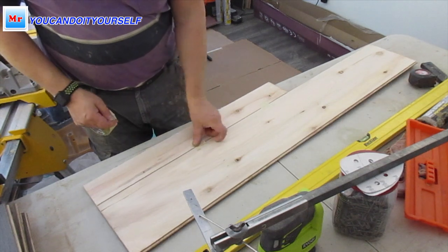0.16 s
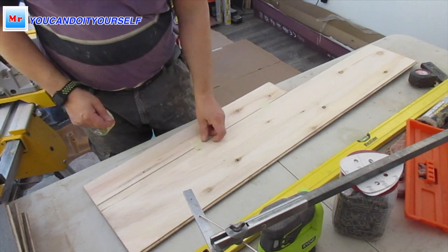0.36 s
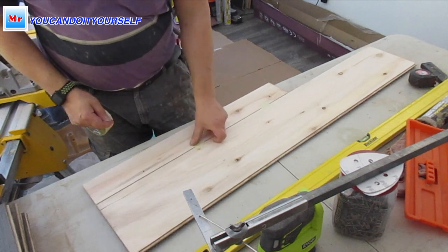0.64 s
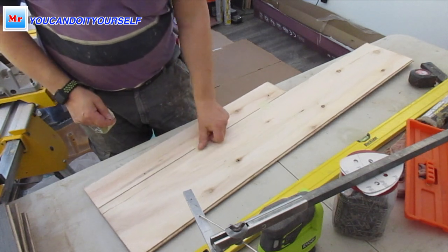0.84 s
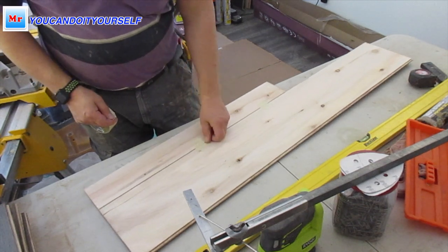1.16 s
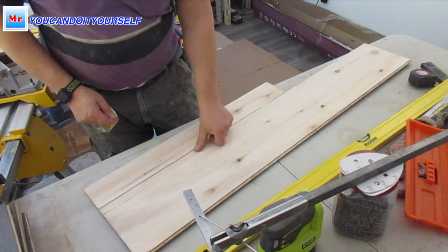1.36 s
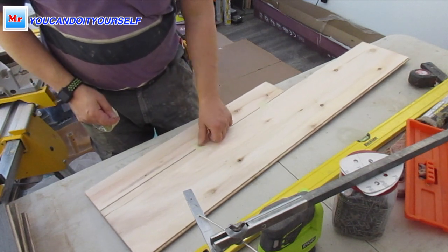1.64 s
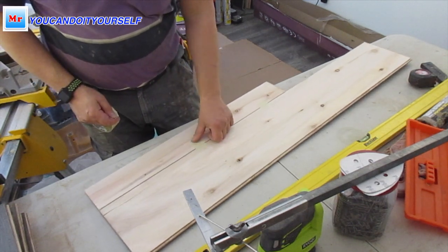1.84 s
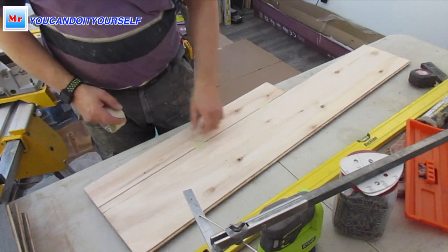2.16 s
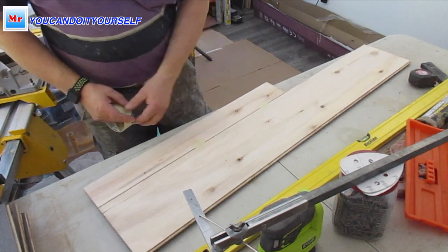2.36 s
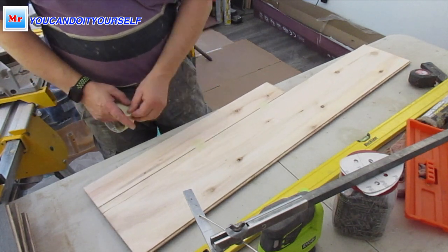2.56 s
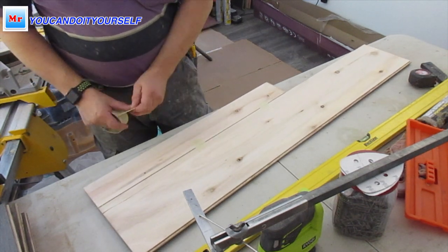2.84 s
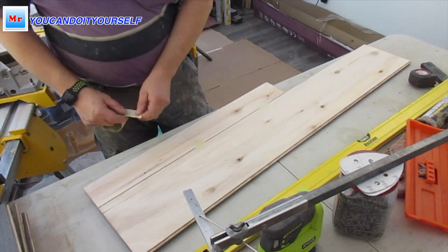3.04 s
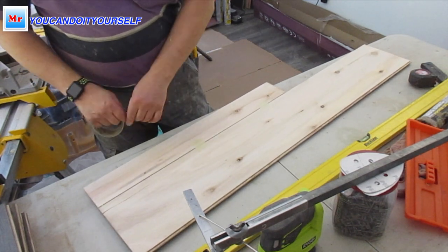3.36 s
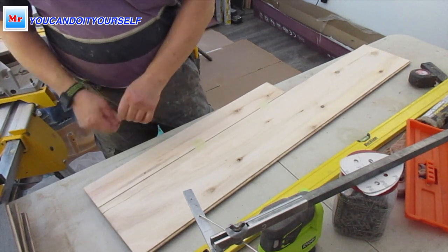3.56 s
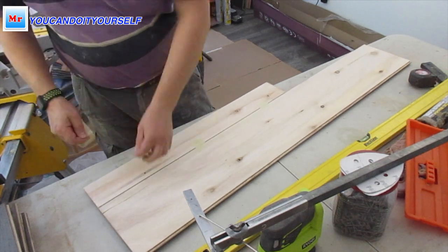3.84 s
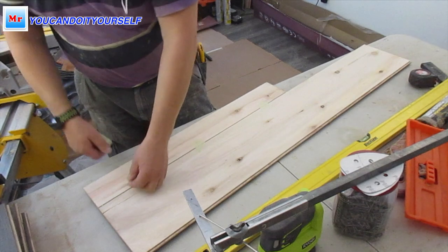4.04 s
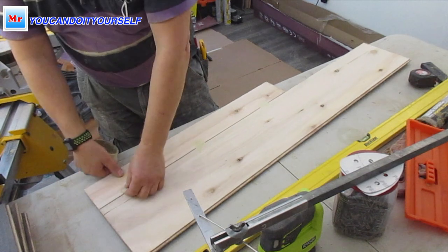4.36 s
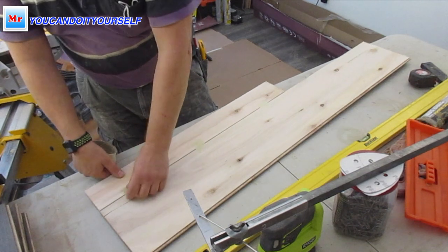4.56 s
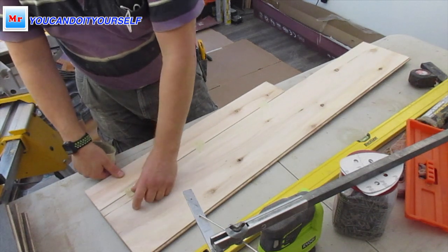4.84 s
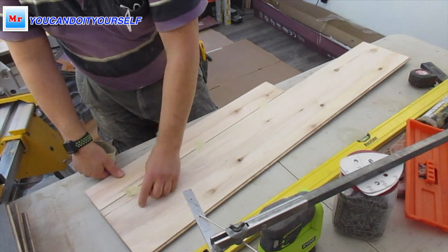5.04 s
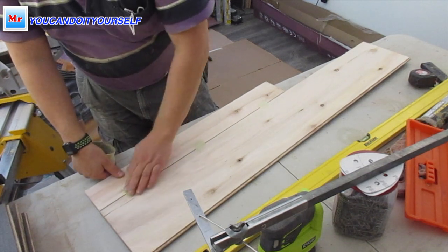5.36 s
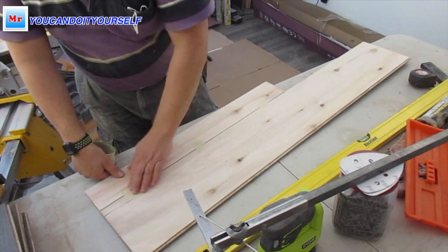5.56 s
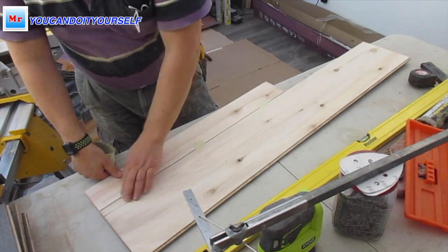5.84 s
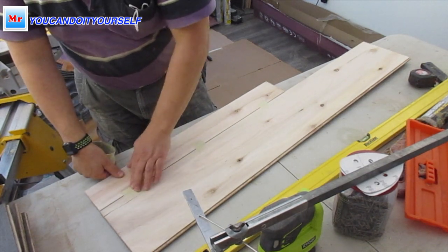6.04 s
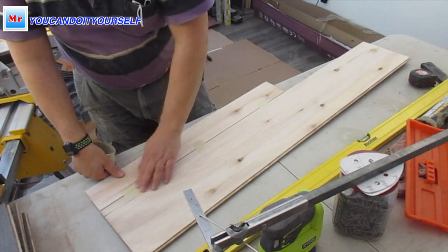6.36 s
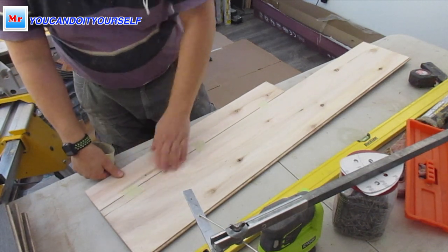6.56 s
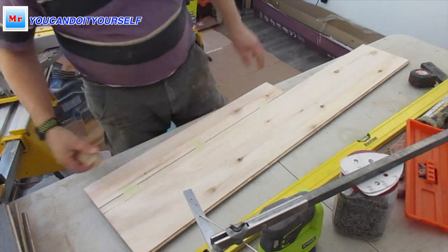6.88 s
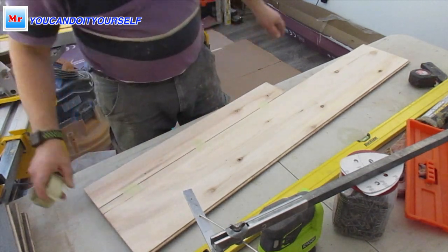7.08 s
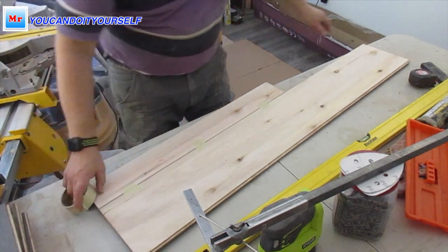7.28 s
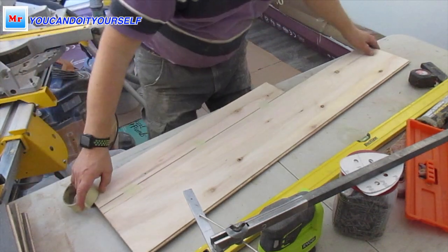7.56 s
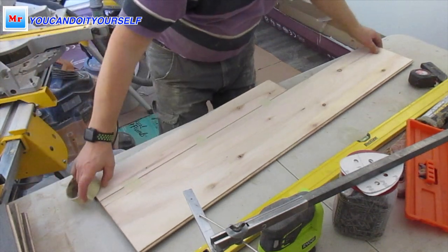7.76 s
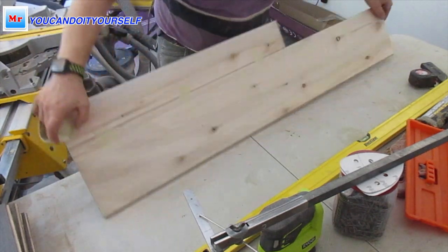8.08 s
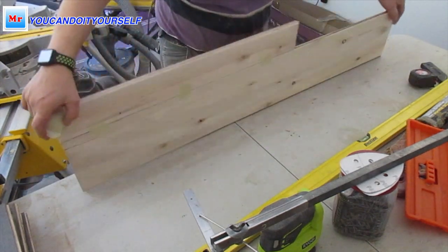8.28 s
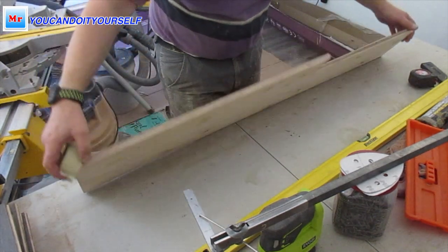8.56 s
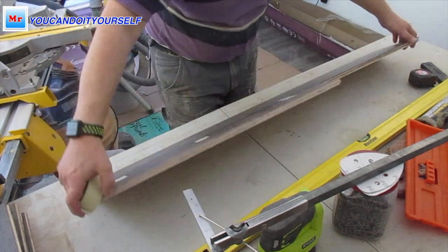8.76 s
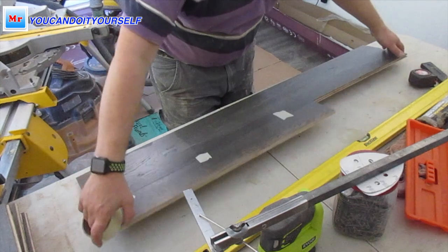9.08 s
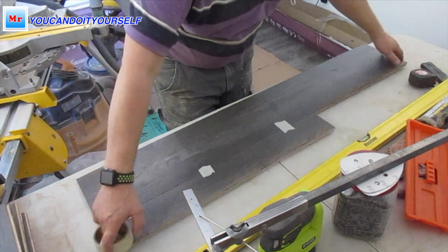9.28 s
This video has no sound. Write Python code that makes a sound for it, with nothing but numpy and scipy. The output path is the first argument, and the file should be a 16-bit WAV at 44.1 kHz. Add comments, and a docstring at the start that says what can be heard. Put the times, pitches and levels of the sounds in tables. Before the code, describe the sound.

Adhesive tape crackles and snaps between soft finger thumps on wood, before boards are dragged over and set down hard in a small workshop.

```python
"""Workshop: strips of tape tear off a roll in two short pulls, then fingers rub and knock boards on a table.
A run of longer, brighter pulls with sharp snaps follows, then more pressing and stroking.
At last the boards are dragged, tipped up and laid down with a knock; a steady outdoor drone lies under all.
Blows ring the modes of the wood, friction and tearing are random grains through resonances, and the drone
is coloured noise. A diffuse room echo follows every near sound."""
import sys
import numpy as np
from scipy import signal
from scipy.fft import rfft, irfft
from scipy.io import wavfile

SR = 44100
rng = np.random.default_rng(int(sys.argv[2]) if len(sys.argv) > 2 else 0)


def store_pcm(level_fs):
    """Save levels as 16-bit WAV."""
    pcm = np.round(np.clip(level_fs, -1, 1) * 32767).astype(np.int16)
    wavfile.write(sys.argv[1], SR, np.atleast_2d(pcm).T)


N = 415289

# Blows on boards and table. Each row: start in seconds, thump level in dB, then relative to the thump
# the deep part, wooden ring, tock and crack in dB, and last the tock and crack pitch in Hz.
BLOWS = [(0.205, -57, 7, -2.5, -6, -25, 348, 1300), (0.317, -63, 5, 1, -18, -25, 344, 1300),
         (0.632, -38.5, -14, 1.5, -7, -9.5, 420, 1310), (0.725, -36, -3, -5.5, -10, -21, 420, 1170),
         (0.838, -38.5, -7, -9.5, -20, -18, 347, 1630), (1.037, -58, 8, -13, -1, 14, 350, 1070),
         (1.293, -33, -11, 3.5, -18, 5, 243, 1180), (1.414, -36.5, -3.5, -7.5, -18, -4.5, 370, 1140),
         (2.165, -32, -9.5, 3, -42, -1, 242, 1180), (4.163, -50, -3, 1, -4, -10, 355, 1770),
         (4.425, -44.5, 0, -9, -24, -20, 620, 1510), (4.601, -56, -3, -6, 3.5, -1, 343, 1620),
         (5.251, -47.5, -31, -10, -18, -8, 273, 1680), (5.399, -47, -30, -4, 4, -23, 337, 1270),
         (5.572, -48.5, -12, -10, -8, -13, 295, 1290), (5.712, -40, -32, -10, -7.5, -24, 323, 1450),
         (5.963, -49, -12, -18, -2, -8, 356, 1120), (6.084, -40.5, -29, -19, -10, -13, 248, 1140),
         (6.334, -47, -7, -12, -9, -17, 302, 1300), (6.741, -31.5, -5.5, 7, -21, 2.5, 380, 1290),
         (7.198, -39.5, -13, 16, 15, 1.5, 499, 2870), (7.238, -33, -26, -2, -21, -33, 330, 1300),
         (7.566, -44.5, 4, -2.5, -6.5, -15, 344, 1580), (7.894, -42, -24, -4, -2, -7, 580, 1260),
         (8.046, -27, -26, 4.5, -8.5, -3.5, 640, 2700), (8.217, -41.5, 1, -1, -20, -15, 288, 1514),
         (8.86, -49.5, -6, 5, 3, -10, 606, 900), (8.742, -51.5, 4, -16, -1, 3, 377, 1900),
         (9.292, -23.5, -11, 1, -5.5, 1.5, 291, 1240)]
# Modes of boards, table and air of the room together. Each row: frequency in Hz, relative level in dB,
# decay time t60 in seconds.
WOOD_MODES = [(58.6, -11.5, 0.98), (72.1, -6.5, 0.76), (132.6, -9, 0.23), (137.4, 3, 0.46),
              (180.4, -4.5, 0.29), (211.6, 0, 0.25), (225.7, -1.5, 0.18), (238, -10, 0.47),
              (259.7, -1, 0.17), (288, -8, 0.51), (330.7, 0, 0.24), (345, -3.5, 0.34), (366.2, 0, 0.32),
              (400.8, -3, 0.3), (422.7, -5, 0.5), (444.5, -13, 1), (477, -6.5, 0.56), (535, -8, 0.51),
              (588, -8, 0.34), (581, -15.5, 0.22), (627, -4.5, 0.12), (710, -2, 0.11), (708, -4.5, 0.12),
              (743, -16.5, 0.22), (811, -20.5, 0.4), (873, -20.5, 0.88), (943, -9.5, 0.17)]
CONTACT_S = 0.0029   # decay constant of a fingertip's push


def board(push, rumble):
    """Modal synthesis: blows excite every mode of the wood, and sliding shakes the same modes with grains."""
    start_s, thump_db, deep_db, wood_db = np.transpose(BLOWS)[:4]
    starts = np.round(start_s * SR).astype(int)
    out = np.zeros(N)
    shake = push * grains(1500, spread_db=1.5)
    pressing = rumble * rng.standard_normal(N)
    contact = np.exp(-1 / (CONTACT_S * SR))
    for k, (hz, level_db, t60) in enumerate(WOOD_MODES):
        # each blow weights the deep, thump and wooden modes in its own way
        if hz < 100:
            part_db = deep_db
        elif hz > 210:
            part_db = wood_db - 13.0
        else:
            part_db = -3
        # neighbours swing against each other, the thump modes together
        sign = -1 if 100 < hz < 210 else (-1) ** k
        uneven_db = rng.normal(0, 3.1, len(starts))
        clicks = np.zeros(N)
        clicks[starts] = sign * from_db(thump_db + part_db + level_db + uneven_db)
        if hz < 210:   # low modes swell while the finger presses
            clicks = signal.lfilter([2.19 * (1 - contact)], [1, -contact], clicks + 1e-18)
            clicks += from_db(level_db - 38.5) * pressing
        else:   # sliding damps the ring
            out += from_db(level_db - 34.5) * ring(shake, hz, 0.39 * t60) * (-1) ** k
        out += ring(clicks, hz, t60)
    for at_s, thump_db, _, wood_db, tock_db, crack_db, tock_hz, crack_hz in BLOWS:
        tock = ring(signal.unit_impulse(SR // 10), tock_hz, t60=0.052)   # the spot under the blow
        add(out, round(at_s * SR), from_db(thump_db + tock_db + 4) * tock)
        # the crack: a band around its pitch and a wider one, then a diffuse wooden puff
        add(out, *burst(at_s, thump_db + crack_db - 13, 0.83 * crack_hz, 1.22 * crack_hz, t60=0.16))
        add(out, *burst(at_s, thump_db + crack_db - 19.5, low_hz=1100, high_hz=3400, t60=0.18))
        add(out, *burst(at_s, thump_db + wood_db - 14.0, low_hz=180, high_hz=715, t60=0.52))
    return signal.sosfilt(signal.butter(4, 50, "high", fs=SR, output="sos"), out)


# Spectrum of sticking tape. Each row: frequency in Hz, relative density in dB per Hz.
TEAR_SPECTRUM = [(710, -93), (1200, -56), (1400, 1.5), (3590, 1.5), (5070, -4.5), (7170, 8.5), (7910, 5),
                 (9010, 0), (13900, -5.5), (16000, -26)]
# Resonances of stretched strip and roll. Each row: frequency in Hz, width in Hz, relative level in dB.
STRIP_MODES = [(878, 130, -8.5), (2030, 120, -10), (3840, 37, -4), (5050, 280, -17), (7000, 86, -33.5)]
# Sharp ticks, glue letting go or a nail and an edge meeting wood. Each row: start in seconds, level in dB,
# ringing pitch in Hz, wide click in dB relative to that level.
TICKS = [(0.056, -45, 3450, 4.5), (0.1193, -27.5, 4200, -20), (1.2883, -29, 1860, -10.5),
         (2.162, -42.5, 2010, -0.5), (2.1853, -36, 2650, -23), (2.231, -34.5, 4170, -29),
         (2.474, -34.5, 4200, 4.5), (2.4938, -37.5, 3860, 4.5), (2.615, -38, 11500, -11),
         (2.632, -38, 11000, -17), (2.637, -17.5, 11800, -7), (2.6549, -17, 7700, -2),
         (2.6617, -16, 3780, -20), (2.816, -18.5, 3890, -5), (2.8199, -18.5, 8260, 0.5),
         (3.0986, -44, 5360, -2), (3.1254, -42.5, 2850, -1), (3.471, -39, 6840, -0.5),
         (3.5284, -33, 2800, -4), (3.552, -40, 8000, -6), (3.768, -50, 5470, 8.5), (4.4343, -51, 3460, -6),
         (4.5017, -50, 12100, -6), (4.598, -39, 6100, 3), (4.7745, -44, 3830, -10),
         (5.3357, -42, 2960, -27), (6.7425, -33, 1920, -32), (7.1387, -53, 4930, -15),
         (8.291, -34.5, 2900, -8), (8.4801, -33.5, 3680, -16), (9.2945, -22, 2940, -38)]


def tape():
    """Stick-slip fracture: glue threads tear as uneven grains, the free strip drums lower, single spots snap."""
    level, drum, tear_hz = pulls()
    tears = grains(8000, spread_db=3.0)
    crackle = from_db(-7.0) * colour(tears, TEAR_SPECTRUM)
    crackle += from_db(-13.5) * resonate(tears, STRIP_MODES)
    for hz in np.geomspace(2000, 9000, 9):   # the bands near the tearing pitch stand out
        near = np.exp(-(np.log(hz / tear_hz) / 0.48) ** 2)
        flicker = from_db(-11.5 + 2.6 * drift(80))
        crackle += flicker * near * rms_one(band(tears, 0.893 * hz, 1.16 * hz))
    drumming = rms_one(band(band(tears, 670, 1270), 670, 1270))
    out = from_db(2 * drift(150)) * (level * crackle + drum * drumming)
    for at_s, level_db, hz, wide_db in TICKS:
        start = round(at_s * SR)
        tone = ring(signal.unit_impulse(SR // 20), hz, t60=0.0032)
        first_crack = band(signal.unit_impulse(SR // 100), low_hz=1500, high_hz=12900)
        add(out, *burst(at_s, level_db - 13.5, 0.73 * hz, 1.15 * hz, t60=0.053))
        add(out, start, from_db(level_db - 6) * tone)
        add(out, *burst(at_s, level_db + wide_db - 13, low_hz=1790, high_hz=15600, t60=0.034))
        add(out, start, from_db(level_db + wide_db + 3) * first_crack)
    return out


# Pulls at the tape. Each row: time of full tearing in seconds, rise, hold and fall in seconds (see swell),
# tearing level in dB, drumming of the free strip in dB, tearing pitch in Hz.
TAPE_PULLS = [(0.053, 0.0028, 0.00067, 0.12, -54.5, -60, 4100),
              (0.116, 0.004, .004, 0.038, -45.5, -57, 5500), (2.496, 0.082, .002, 0.039, -53.5, -85, 4070),
              (2.637, 0.0018, .002, 0.018, -34, -76, 5400), (2.663, 0.025, 0.046, .02, -34, -74, 3940),
              (2.701, 0.01, 0.0072, 0.11, -34.5, -46.5, 4600),
              (2.824, 0.0044, 0.012, 0.14, -31.5, -54, 4800), (3.123, .002, .004, 0.026, -47, -56, 3400),
              (3.49, 0.023, 0.026, .02, -80, -87, 6240), (3.535, .003, 0.0092, 0.046, -70, -62.5, 2900),
              (3.609, 0.071, .006, 0.053, -36.5, -76, 5640), (3.694, .01, .002, 0.31, -59, -86, 5800)]


def pulls():
    """Superposition: overlapping pulls add their gains, and their pitches average weighted by level."""
    level, drum, pitch = np.zeros((3, N))
    for at_s, rise_s, hold_s, fall_s, level_db, drum_db, tear_hz in TAPE_PULLS:
        start, shape = swell(at_s, rise_s, hold_s, fall_s)
        add(level, start, from_db(level_db) * shape)
        add(drum, start, from_db(drum_db) * shape)
        add(pitch, start, tear_hz * from_db(level_db) * shape)
    return level, drum, (pitch + 1e-9) / (level + 1e-12)


# Spectrum of rubbing. Each row: frequency in Hz, relative density in dB per Hz.
RUB_SPECTRUM = [(350, -19), (600, 5), (698, 1.5), (812, 0), (1830, -6), (2500, -10), (2720, -9.5),
                (9760, -20), (14500, -28), (16000, -43)]
# The scraping pitch rests, then moves as the boards tip up and swing on their edge.
# Each row: time in seconds, pitch in Hz.
EDGE_PITCH = [(7.8, 2360), (7.93, 1450), (8.0, 1860), (8.07, 2720), (8.2, 2780), (8.36, 1240), (8.45, 2260),
              (8.6, 2540)]
# Resonances of the dragged board's thin edge. Each row: frequency in Hz, width in Hz, relative level in dB.
EDGE_MODES = [(1310, 80, -24), (1620, 66, -17), (1870, 73, -9), (2126, 1350, -8), (2887, 150, -16.5),
              (3300, 140, -13.5), (3700, 550, -5)]


def sliding(scrape_gain, swish_gain):
    """Friction as fine grain: wood scrapes below in uneven streaks, skin and dust swish above."""
    wood = colour(grains(5000, spread_db=1.5), RUB_SPECTRUM)
    scrape = rms_one(band(wood, 637, 5230))
    scrape_hz = np.interp(np.arange(N) / SR, *np.transpose(EDGE_PITCH))
    for hz, width_hz, level_db in EDGE_MODES:   # edge resonances near the scraping pitch sing most
        near = np.exp(-(np.log(hz / scrape_hz) / 0.16) ** 2)
        streaks = from_db(level_db + 2 + 4.0 * drift(12))
        scrape += streaks * (.2 + near) * rms_one(ring(wood, hz, 2.2 / width_hz))
    dust = colour(grains(15000, spread_db=1.5), RUB_SPECTRUM)
    swish = rms_one(band(dust, 3700, 21500))
    return from_db(0.81 * drift(30)) * (scrape_gain * scrape + swish_gain * swish)


# The boards dragged, tipped up, swung over and laid down. Each row: time in seconds, scrape, swish and
# push into the board in dB.
BOARD_DRAG = [(7.54, -75, -72, -67), (7.575, -59.5, -59, -42), (7.66, -56, -58.5, -48.5),
              (7.84, -64, -79, -58), (7.966, -46, -69, -31.5), (8.04, -49, -58, -68),
              (8.06, -38.5, -62, -36), (8.168, -52, -59.5, -38), (8.26, -51.5, -63.5, -39.5),
              (8.32, -59, -61, -50.5), (8.41, -52, -53.5, -54), (8.52, -65.5, -72, -59),
              (8.68, -70.5, -82, -62.5), (8.81, -60, -73, -44.5), (8.9, -56, -66, -43.5),
              (8.96, -54, -70, -47.5), (9.184, -74, -94, -64.5), (9.27, -50, -59, -46.5),
              (9.3, -59, -82, -58), (9.417, -53, -79, -58)]
# Fingers stroking tape and wood. Each row: time of full speed in seconds, rise, hold and fall in seconds
# (see swell), scrape, swish and push into the board in dB.
FINGER_STROKES = [(0.195, 0.24, 0.074, 0.37, -69, -71.5, -60.5),
                  (0.724, .06, 0.027, 0.15, -64, -69.5, -43.5),
                  (0.842, 0.036, 0.02, 0.11, -58.5, -76, -54.5),
                  (1.01, 0.16, 0.027, 0.027, -71, -74, -54.5), (1.62, 0.27, 0.035, 0.37, -70.5, -73, -62.5),
                  (2.185, 0.0089, 0.025, 0.017, -59, -60.5, -37),
                  (2.228, .005, .03, 0.13, -59.5, -54, -43.5), (4.497, 0.044, 0.02, 0.084, -73, -66, -61),
                  (4.597, 0.016, 0.012, 0.087, -71, -64, -58), (4.774, .003, 0.0055, 0.1, -61.5, -71, -59),
                  (4.997, 0.39, 0.053, 0.077, -76, -79, -70),
                  (5.334, 0.012, 0.0082, 0.072, -59, -65.5, -49),
                  (5.394, 0.046, 0.056, 0.048, -70, -71, -49), (5.558, 0.048, .06, 0.06, -64, -71, -56.5),
                  (5.735, .05, .08, 0.04, -68.5, -71.5, -48), (5.94, 0.05, 0.056, 0.051, -65.5, -74, -60),
                  (6.111, 0.026, 0.067, 0.064, -66, -73, -51.5),
                  (6.325, 0.08, 0.066, 0.22, -61.5, -69.5, -54),
                  (6.547, 0.072, 0.063, .07, -72.5, -74, -69), (7.129, .02, 0.093, 0.08, -69, -66.5, -53.5)]


def friction():
    """Superposition: gains of scrape, swish and push add up from the board drag and every finger stroke."""
    gains = in_time(BOARD_DRAG)
    for at_s, rise_s, hold_s, fall_s, *levels_db in FINGER_STROKES:
        start, shape = swell(at_s, rise_s, hold_s, fall_s)
        for gain, level_db in zip(gains, levels_db):
            add(gain, start, from_db(level_db) * shape)
    return gains


# Decay of the room. Each row: frequency in Hz, decay time t60 in seconds.
ROOM_DECAY = [(300, 0.46), (600, 0.55), (1500, 0.38), (4000, 0.5), (9000, 0.44), (15000, 0.37)]


def room(x):
    """Diffuse reverberation: octave bands of noise, each dying at its own rate, convolved with the sound."""
    t = np.arange(SR) / SR
    noise = rng.standard_normal(SR)
    tail = np.zeros(SR)
    for low_hz in 220 * 2 ** np.arange(7):
        t60 = at_hz(ROOM_DECAY, 2.03 * low_hz)
        tail += band(noise, low_hz, min(2 * low_hz, 17000)) * from_db(-60 * t / t60)
    tail *= np.clip((t - .004) / 0.0057, 0, 1)   # first walls answer after a few milliseconds
    return signal.fftconvolve(x, tail / np.sqrt(np.sum(tail ** 2)))[:N]


# Spectrum of the outdoor drone. Each row: frequency in Hz, relative density in dB per Hz.
DRONE_SPECTRUM = [(12, -5), (20, 5.5), (142, -7), (172, -17.5), (216, -11.5), (410, -19.5), (459, -13.5),
                  (513, -16.5), (698, -29), (1090, -7.5), (1220, -13), (1530, -17), (1910, -25.5),
                  (9140, -32), (16000, -45)]
# Soft resonances in the drone. Each row: frequency in Hz, damping in Hz (t60 is 3.3 s over it), level in dB.
DRONE_MODES = [(807.4, 60, -76), (914, 38, -75.5), (1020, 80, -79), (1512, 130, -73), (1644, 70, -74.5)]
DRONE_DB = -63.5


def drone():
    """Filtered noise: rumble and a distant mid-range roar, with a few soft wavering resonances."""
    out = from_db(DRONE_DB + 1.0 * drift(1.1)) * colour(rng.standard_normal(N), DRONE_SPECTRUM)
    noise = rng.standard_normal(N)
    for hz, damping_hz, level_db in DRONE_MODES:
        waver = from_db(2 * drift(4))
        out += from_db(level_db) * waver * rms_one(ring(noise, hz, 3.3 / damping_hz))
    return out


def swell(at_s, rise_s, hold_s, fall_s):
    """Exponential envelope and its start sample: up 20 dB per rise, hold, down 20 dB per fall."""
    rise_s, hold_s, fall_s = np.clip([rise_s, hold_s, fall_s], .001, .3)   # shortest and longest, seconds
    start = max(round((at_s - 2 * rise_s) * SR), 0)
    t = np.arange(start, (at_s + hold_s + 3 * fall_s) * SR) / SR - at_s
    return start, from_db(20 * np.minimum(0, np.minimum(t / rise_s, (hold_s - t) / fall_s)))


def burst(at_s, level_db, low_hz, high_hz, t60):
    """Exponential decay of band noise, rising over about two cycles: start sample and sound."""
    t = np.arange(SR // 6) / SR
    puff = rms_one(band(rng.standard_normal(len(t)), low_hz, high_hz))
    rise = np.minimum(t * low_hz / 2.17, 1)
    return round(at_s * SR), from_db(level_db - 60 * t / t60) * rise * puff


def ring(x, hz, t60):
    """Damped oscillator: a unit click sets a decaying sine of height about 1 ringing."""
    r = from_db(-60 / (t60 * SR))
    w = 2 * np.pi * hz / SR
    return signal.lfilter([0, np.sin(w)], [1, -2 * r * np.cos(w), r * r], x + 1e-18)


def resonate(x, peaks):
    """Parallel resonances, each of rms set by its dB."""
    return sum(from_db(db) * rms_one(ring(x, hz, 2.2 / width_hz)) for hz, width_hz, db in peaks)


def grains(per_s, spread_db):
    """Shot noise: random clicks of uneven size and either sign, scaled to rms 1."""
    sizes = from_db(spread_db * np.minimum(rng.exponential(1, N), 5)) * rng.choice([-1, 1], N)
    return rms_one(sizes * (rng.random(N) < per_s / SR))


def drift(rate):
    """Slow random modulation: normal values about 0, rate of them a second, joined by straight lines."""
    knots = rng.standard_normal(2000)
    return np.interp(np.arange(N) / SR * rate, np.arange(2000), knots)


def colour(x, spectrum):
    """Spectral shaping of noise or grains by a table; rms 1."""
    hz = np.maximum(np.fft.rfftfreq(N, 1 / SR), 1)
    return rms_one(irfft(rfft(x) * from_db(at_hz(spectrum, hz)), N))


def band(x, low_hz, high_hz):
    """Band-pass filtering."""
    sos = signal.butter(2, [low_hz, min(high_hz, .47 * SR)], "band", fs=SR, output="sos")
    return signal.sosfilt(sos, x)


def at_hz(points, hz):
    """Interpolation of a table on a log-frequency axis."""
    table_hz, values = np.transpose(points)
    return np.interp(np.log(hz), np.log(table_hz), values)


def in_time(rows):
    """Interpolation in decibels: gains from the dB columns of a curve, silent outside it."""
    s, *columns = np.transpose(rows)
    t = np.arange(N) / SR
    return from_db([np.interp(t, s, column, left=-150, right=-150) for column in columns])


def from_db(db):
    """Decibels to gain."""
    return 10 ** (np.asarray(db) / 20)


def rms_one(x):
    """Normalisation to rms 1."""
    return x / np.sqrt(np.mean(x ** 2) + 1e-20)


def add(out, start, sound):
    """Superposition: mix a sound in at a sample."""
    out[start:start + len(sound)] += sound[:N - start]


RUMBLE_DB, RUMBLE_FOLLOWS = -31.5, 0.44   # the low rumble follows the push, with this share of its dB swing
ROOM_DB = -5


def scene():
    """Superposition of everything on the table, its echo and the drone."""
    scrape, swish, push = friction()
    rumble = from_db(RUMBLE_DB) * push ** RUMBLE_FOLLOWS
    near = board(push, rumble) + sliding(scrape, swish) + tape()
    return (near + from_db(ROOM_DB) * room(near) + drone())[None]


NOTCH_HZ, NOTCH_WIDTH_HZ, NOTCH_DEPTH = 7950, 200, .8   # depth: share taken out at the centre
STOP_HZ = 1.06 * 15800   # from here up the treble is 70 dB down


def record(dry):
    """Filtering and saturation: a dip from the microphone housing, rounded peaks, the top cut off."""
    b, a = signal.iirpeak(NOTCH_HZ, NOTCH_HZ / NOTCH_WIDTH_HZ, fs=SR)
    dipped = dry - NOTCH_DEPTH * signal.lfilter(b, a, dry)
    rounded = .2 * np.tanh(dipped / .2)
    return signal.sosfilt(signal.cheby2(12, 70, STOP_HZ, fs=SR, output="sos"), rounded)


dry = scene()
out = record(dry)
store_pcm(out)
```